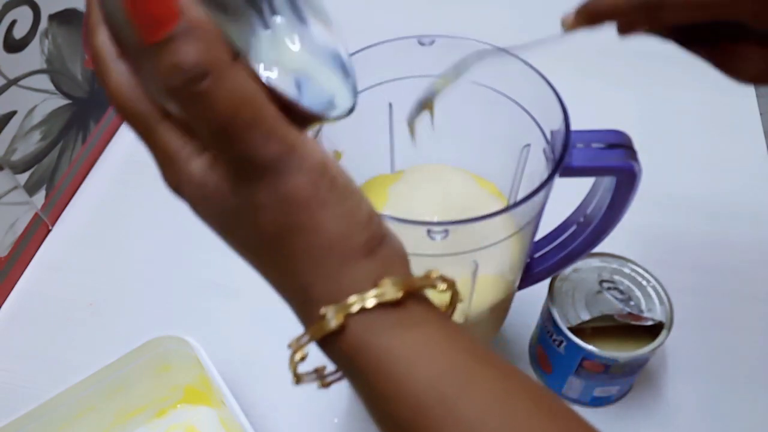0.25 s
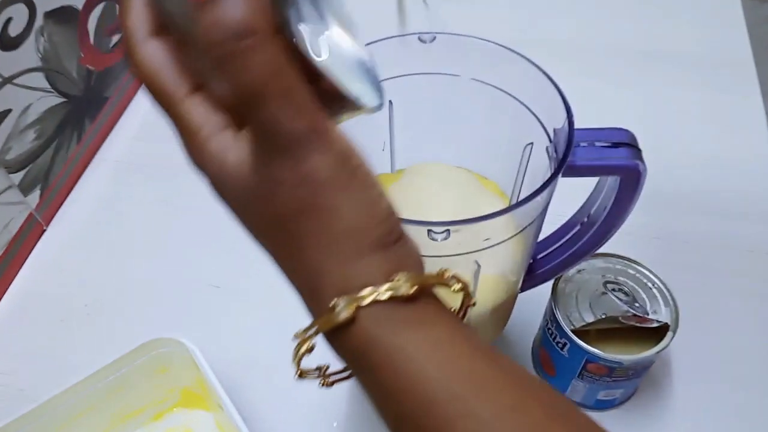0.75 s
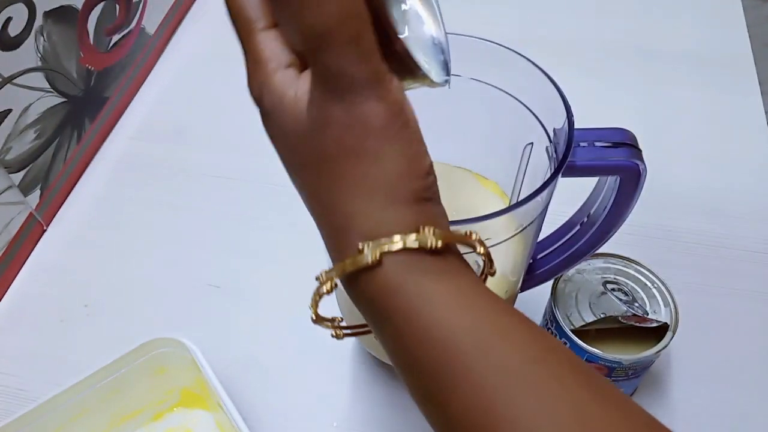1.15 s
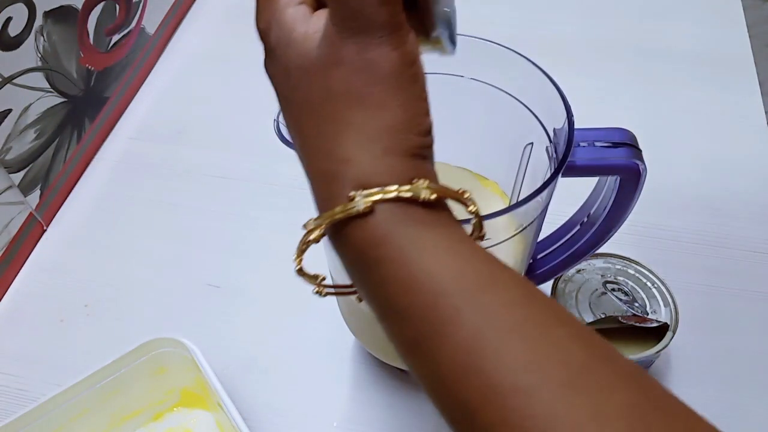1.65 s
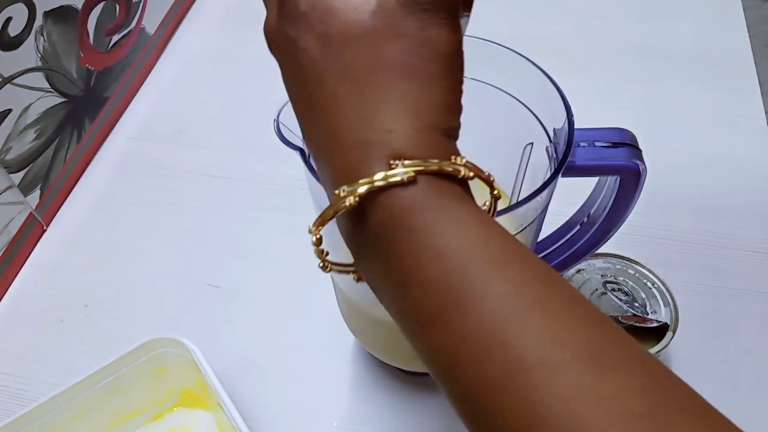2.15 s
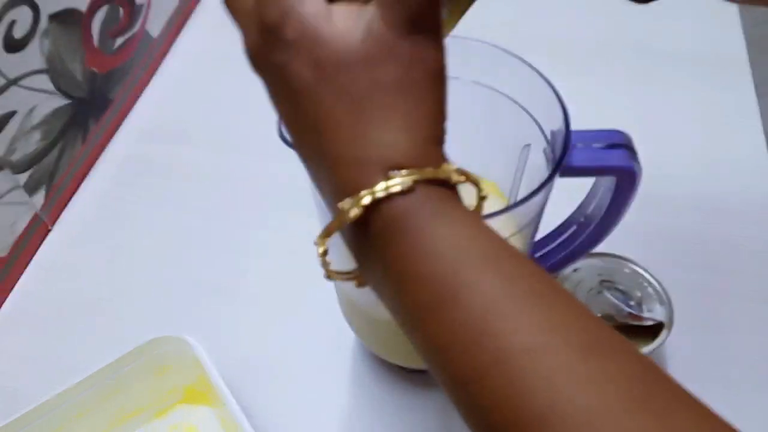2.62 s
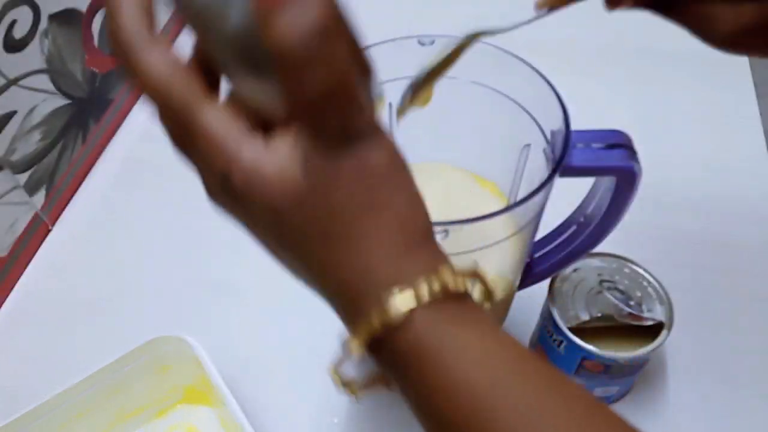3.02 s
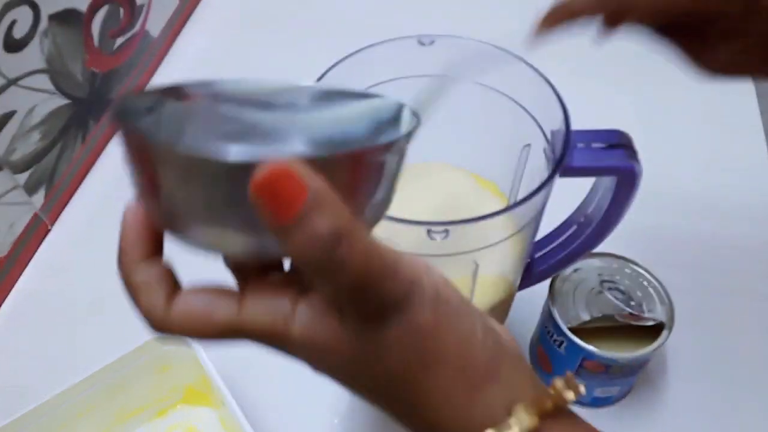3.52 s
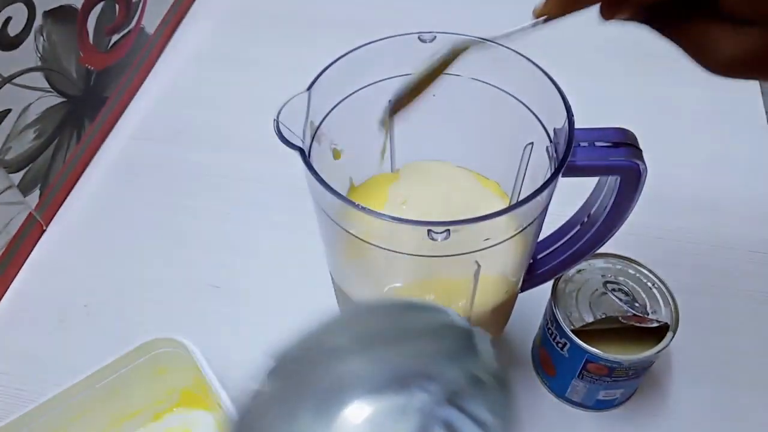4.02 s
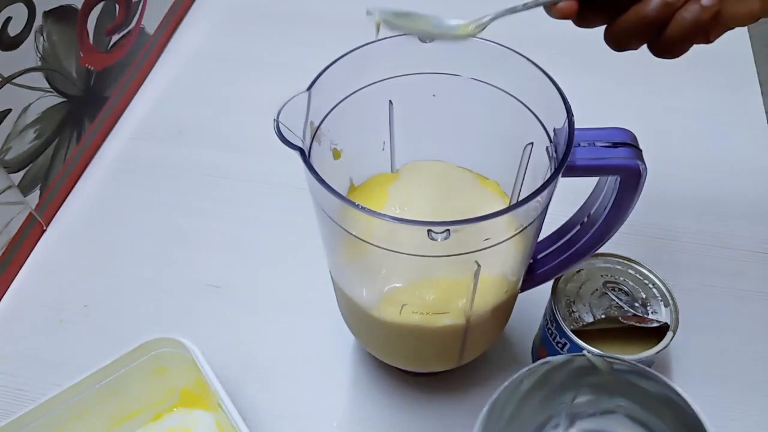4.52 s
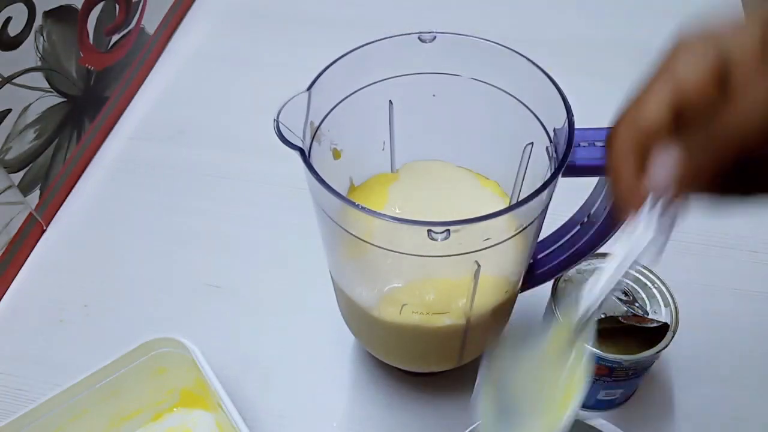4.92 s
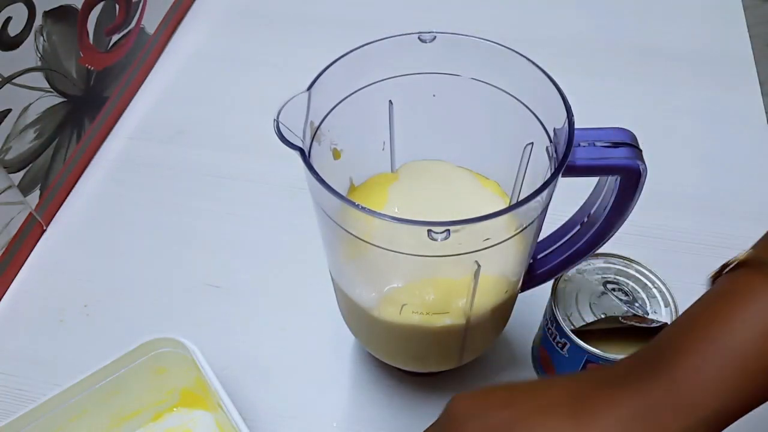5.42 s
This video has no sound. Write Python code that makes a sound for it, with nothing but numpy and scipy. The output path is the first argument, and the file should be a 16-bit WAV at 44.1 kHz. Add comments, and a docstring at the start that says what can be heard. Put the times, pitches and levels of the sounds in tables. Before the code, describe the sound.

Bright metallic scraping and clinking in three strokes, a quiet gap with faint hum and arm rustle, then a final spoon clatter in a bowl.

```python
"""In a small kitchen a steel spoon taps and scrapes the inside of a hand-held steel bowl, and is later
laid into it on the table. Clicks and tiny catches make the metal's modes ring; wall tones sing along.
A motor hums (resonant noise, with a pure tone at the core of its sharpest note), air hisses and moving
arms rustle (coloured noise); the walls add echoes to the metal.
A noise suppressor turns the sound down whenever nothing loud goes on."""
import sys
import numpy as np
from scipy import signal
from scipy.fft import rfft, irfft, next_fast_len
from scipy.io import wavfile
from scipy.ndimage import uniform_filter1d

SR = 44100
rng = np.random.default_rng(int(sys.argv[2]) if len(sys.argv) > 2 else 0)


def bounce(signal):
    """Save signal as a 16-bit WAV file at the path given by the first command-line argument."""
    frames = np.transpose(np.atleast_2d(signal))
    limited = np.clip(frames, -1, 1)
    pcm = np.round(limited * 32767).astype(np.int16)
    wavfile.write(sys.argv[1], SR, pcm)


def gain_from_db(level_db):
    """Turn a decibel level (scalar or array-like) into a linear amplitude factor."""
    decades = np.asarray(level_db, float) / 20
    return 10 ** decades


N = 250047

# The room's noise. Each row: frequency in Hz, relative level in dB per Hz.
AIR_SPECTRUM = [(25, -34), (45, -11.5), (100, 4.5), (170, -2), (240, -0.5), (340, 3), (520, -1),
                (800, -6.5), (1500, -9.5), (3500, -13), (5000, -26), (8050, -23.5), (10500, -32),
                (15500, -34)]
# The motor's notes. Each row: frequency in Hz, width of each resonance in Hz, rms level in dB.
MOTOR_NOTES = [(61.6, 16, -57.5), (133.9, 4.6, -44.5), (154, 40, -55), (204.8, 11, -57.5)]
# A soft rustle as arms move. Each row: time in seconds, relative treble level in dB, middle level in dB.
RUSTLE_LEVELS = [(2.95, -70, -75), (3.3, -65.5, -66), (3.63, -63, -61), (3.86, -57, -87),
                 (3.99, -58.5, -73), (4.07, -52, -56.5), (4.43, -57, -52.5), (4.64, -81, -80),
                 (4.87, -74, -64), (5.1, -63, -53), (5.25, -53, -46.5), (5.44, -55, -49)]
# Colour of its treble. Each row: frequency in Hz, relative level in dB per Hz.
RUSTLE_SPECTRUM = [(4500, -12), (6000, -11), (8050, 3.5), (9500, -6.5), (11600, -11.5), (15500, -11.5)]
# Small ticks as the hand reaches down, the second with a dull and a bright part.
# Each row: start in seconds, level in dB, centre in Hz, width in Hz, length in ms.
TICKS = [(5.093, -47, 8800, 2000, 1.7), (5.266, -38, 1790, 1500, 2.2), (5.266, -47, 9000, 6000, 3.0)]
# Three brief puffs. Each row: start in seconds, level in dB, length in ms.
PUFFS = [(5.296, -50.5, 6.7), (5.338, -53, 10), (5.388, -55.5, 6.8)]
# The bands of a puff. Each row: centre in Hz, width in Hz, level against the puff in dB.
PUFF_BANDS = [(3980, 450, 3), (9100, 860, 1.5), (11800, 3000, -4)]

# Edges between the six families of the metal's modes. Each entry: frequency in Hz.
FAMILY_EDGES_HZ = [950, 1300, 2200, 3500, 6000, 10000, 16000]
# Broad modes of spoon and hand-held bowl in contact.
# Each row: frequency in Hz, width in Hz, relative level in dB, dB gained when the spoon is at the rim.
HELD_MODES = [(1072, 17, -8, -10), (1140, 64, -1.5, 3), (1257, 150, -12, 0.5), (1435, 71, -3.5, -10.5),
              (1548, 25, 7, -1), (1628, 50, -12.5, 23), (1973, 120, -5.5, 5.5), (2730, 20, -2, 2),
              (2827, 47, 8.5, 0), (2937, 50, 4, 11.5), (2960, 15, 5, -7), (3010, 30, -25, -16),
              (3530, 92, -19, -10), (3250, 110, -21, -28), (3824, 120, -12.5, -15.5),
              (4026, 180, -8.5, -10), (4820, 210, -21.5, 22.5), (5340, 59, -9, 18.5), (6670, 130, -14, 2),
              (7470, 410, -16, 4), (7970, 190, -13.5, 12), (9320, 89, -14.5, -6.5), (9200, 53, -48, 18),
              (10890, 30, -14, -1.5), (11540, 400, -30.5, -1), (12520, 310, -39, 7),
              (12800, 140, -28.5, -11), (13100, 140, -24.5, -5), (14100, 100, -34, -1),
              (14600, 220, -20, -3)]
# The same columns for the bowl standing on the table.
RESTING_MODES = [(1210, 1200, -14, 1.5), (1445, 72, 0, 1.5), (1627, 20, -11, -14), (1710, 6.6, -51, 18),
                 (1880, 32, -33, 0), (2770, 21, 2, -6.5), (2890, 36, -4.5, -5.5), (2947, 28, -4, 8.5),
                 (3060, 25, -9, 14), (4440, 50, -24, -6), (5100, 21, -25.5, 2), (6000, 67, -30, 2),
                 (6450, 43, -13, 6), (7270, 8.3, 2, 6.5), (8000, 40, -9, 2), (8200, 120, -14, -4),
                 (8850, 49, -5.5, 6.5), (10140, 220, -19, 6.5), (11100, 90, -23, 0.5), (12000, 65, -21, -4),
                 (13400, 160, -24, 6), (14400, 60, -19, 0), (15100, 41, -10, 5)]
# What the table adds to the rubbing. Each entry: gain of one family in dB.
TABLE_GAIN_DB = [0.5, 3, 2.5, 0, .3, 1.5]
# Where the spoon touches. Each row: time in seconds, place from about -1 deep in the bowl to 1 at the rim.
SPOON_PLACE = [(1.0, -0.92), (1.3, -0.32), (1.6, -0.83), (1.68, 0.91), (1.9, 1), (2.1, -0.088),
               (2.25, -0.71), (2.5, -0.91), (2.7, -0.78), (2.95, -1.12), (5.4, 1), (5.5, 0.56),
               (5.55, -1.34), (5.67, -0.78)]
# Taps. Each row: time in seconds, then relative levels in dB of family one, two, three, four, the top two.
TAPS = [(1.0315, -27, -38, -26, -17.5, -20.5), (1.0367, -45, -48, -24, -29, -28),
        (1.0462, -40, -44, -28, -24.5, -31), (1.074, -20.5, -28, -44, -23, -27.5),
        (1.1867, -48, -47, -42, -30, -38), (1.4026, -12, -53, -22, -23.5, -20),
        (1.425, -25, -28, -47, -44, -42), (1.5371, -26, -24, -33, -34, -40),
        (1.6874, -20, -16.5, -8, -23.5, -18), (1.8344, -32.5, -44, -34, -54, -45),
        (1.9809, -37.5, -49, -27.5, -43, -51), (2.5217, -60, -43, -23.5, -50, -54.5),
        (2.6244, -59, -53, -48, -52, -31.5), (2.71, -55, -37, -39.5, -30.5, -35.5),
        (5.445, -21, -22, -19.5, -24.5, -27), (5.6654, -27.5, -33, -48, -45, -32.5)]
# Which column of a tap drives each family. Each entry: a column number.
TAP_COLUMN = [1, 2, 3, 4, 5, 5]
# Toneless share of the scrape. Each entry: relative level for one family in dB.
RASP_DB = [-33, -27, -18, -31, -8, -5]
# Toneless share of a tap. Each entry: relative level for one family in dB.
CRACK_DB = [4, -14, -26, -11, 7.5, -41]
# Short ring of a tap while the spoon still touches. Each entry: relative level for one family in dB.
PRESSED_DB = [-10, -8.5, -5, -11, -4, -3.5]
# Long ring once the spoon lifts. Each entry: relative level for one family in dB.
FREE_DB = [-2, -11, -17, -11, -11, -25]
# How far the couplings drift as the contact slides. Each entry: spread for one family in dB.
WANDER_DB = [2.8, 3, 2.44, 2.1, 3.9, 3.5]

# Three strokes round the held bowl and a last flick. Each row: time in seconds, treble rasp in dB,
# low tones against it in dB, middle tones against it in dB, how freely the wall sings in dB.
STROKES = [
    [(1.04, -38, 6, 7, 6.5), (1.06, -40.5, -16, 5, -2.5), (1.092, -44.5, -7, 10.5, 5.5),
     (1.13, -48.5, 11, -4, -6.5), (1.16, -44.5, 3.5, 3.5, -3), (1.27, -40, 0.5, 2, -1.5),
     (1.345, -34, -1, 6.5, 3.5), (1.385, -37.5, -4.5, 6, 1.5), (1.412, -39.5, 21.5, 9, 3),
     (1.448, -42, -3, 10.5, 2), (1.476, -33, 8.5, -14, -2), (1.518, -42.5, 4.5, 3, -0.5),
     (1.546, -47.5, 1, 14, 4.5), (1.582, -50.5, 13.5, 2, 2), (1.67, -66, 4, 10, 0.5)],
    [(1.7, -43, -3, 7.5, -3), (1.738, -40.5, 6, 8.5, -1.5), (1.756, -38, -4, 4.5, -2.5),
     (1.83, -46.5, 2.5, 9.5, -2), (1.88, -56, 4, 7.5, -2.5), (1.925, -60, 8, 9, -2.5)],
    [(1.955, -54, -4, 9, 0), (1.984, -46, -1, 10, -0.5), (2.006, -43, -20, -7.5, -1.5),
     (2.03, -41, -13, -1.5, -1), (2.05, -35, -20, 2, 5), (2.095, -36, -2.5, 5, 2), (2.15, -41, -5, 6.5, 2),
     (2.2, -42, -6.5, 3.5, 2.5), (2.276, -45, -9.5, -0.5, 0), (2.31, -46, -9, 6, 9),
     (2.4, -46, 0.5, 4.5, -5), (2.454, -46.5, -2.5, 10.5, 0.5), (2.485, -46, 11, 2.5, -4.5),
     (2.52, -45.5, 8, 7.5, -4.5), (2.57, -47.5, 2.5, 0.5, -5), (2.66, -53, 10, -3.5, -6.5)],
    [(2.69, -46.5, -5, 1.5, -1.5), (2.72, -42, -5, 8.5, -2), (2.738, -52, -4.5, 12, 1.5),
     (2.775, -56, 7, 6.5, -5), (2.91, -73.5, 2, 10.5, -3.5), (2.95, -79, 17, 17, -2)],
]
# The same columns for the spoon sliding into the bowl on the table.
SLIDE = [(5.452, -29, -13, 0, .5), (5.49, -42, 1.5, 6, .5), (5.522, -43.5, 3.5, 2, .5),
         (5.558, -38, 9, -3, 0.17), (5.588, -39, 6, 1, .5), (5.616, -45, 0.5, 3, .5),
         (5.656, -47.5, 9, -0.5, 0.43), (5.67, -52, 8, 9, .5)]
# How each family follows a stroke. Each row: level against the rasp in dB, share of the low tones,
# share of the middle tones, dB gained at the rim, dB lost per dB of free singing.
FOLLOWS = [(-5.5, 0.86, 0.017, 4, -0.7), (1, 0.62, 0.038, 1, -0.14), (1, -0.078, 1.0, -2, 0.86),
           (-8, -0.4, 0.056, -3, 0.05), (-1, 0.12, 0.065, -2.8, 0.14), (-4, -0.18, 0, -0.9, 0.4)]
# The broad rasp near 4 kHz swells and fades on its own while the bowl is held.
# Each row: time in seconds, gain of the fourth family in dB.
FOURTH_FAMILY_SWELL = [(1.04, -2), (1.15, 10.5), (1.28, 2.5), (1.36, -8), (1.6, -10), (1.9, 3), (2.15, 0.5),
                       (2.28, 2.5), (2.45, 0.5), (2.601, -4), (2.71, 4.5), (2.9, 5.5)]
# Third and fourth wall tones. Each row: time in seconds, third against the rasp in dB, fourth in dB.
UPPER_TONES = [(1.04, -14, -24), (1.095, -2, -14), (1.15, -12, -18), (1.25, -14, -14), (1.4, -10.5, -12),
               (1.46, -19, -11), (1.6, -10, -11), (1.75, -15, -28), (1.97, -29, -13), (2.07, -12, -17),
               (2.15, -15, -16), (2.19, -21, 0), (2.33, -18, -13), (2.5, -22, -9.5), (2.73, -15.5, -12)]
# Higher wall tones. Each entry: frequency in Hz.
OVERTONE_HZ = [6650, 7550, 9130, 10350, 12000]
# The same tones. Each row: width in Hz, level against the second tone in dB.
OVERTONES = [(48.6, -15), (43, -15.5), (54, -46), (50, -30), (50, -19)]
# Blows that leave the lowest tone ringing free. Each row: time in seconds, starting level in dB.
FREE_RINGS = [(1.402, -29.5), (1.69, -49), (2.09, -69.5), (2.713, -32.5)]


def rms_one(x):
    """Scales a sound to an rms of 1."""
    return x / np.sqrt(np.mean(x ** 2) + 1e-20)


def in_time(rows):
    """Joins the columns by straight lines, with a level of -120 dB before and after."""
    s, *columns = np.transpose(rows)
    return [np.interp(np.arange(N) / SR, s, column, left=-120, right=-120) for column in columns]


def drift(rate_hz):
    """Slow chance with spread 1: smoothed noise, drawn once per 40 samples."""
    r = np.exp(-80 * np.pi * rate_hz / SR)
    slow = signal.lfilter([1], [1, -2 * r, r * r], rng.standard_normal(N // 40 + 2002))[2000:]
    return np.interp(np.arange(N) / 40, np.arange(len(slow)), rms_one(slow))


def resonate(x, hz, width_hz):
    """Two-pole resonance with gain 1 on top: a narrower one rings longer."""
    r = np.exp(-np.pi * max(width_hz, 1) / SR)
    top = np.array([1, 0, -1]) * (1 - r * r) / 2
    return signal.lfilter(top, [1, -2 * r * np.cos(2 * np.pi * hz / SR), r * r], x + 1e-18)


def band(x, low_hz, high_hz):
    """Keeps what lies between two frequencies."""
    return signal.sosfilt(signal.butter(2, [low_hz, high_hz], "band", fs=SR, output="sos"), x)


def coloured(points):
    """Steady noise with the given spectrum, rms 1."""
    hz, level_db = np.transpose(points)
    size = next_fast_len(N)
    shape = gain_from_db(np.interp(np.log(np.fft.rfftfreq(size, 1 / SR) + 1), np.log(hz), level_db))
    return rms_one(irfft(rfft(rng.standard_normal(size)) * shape, size)[:N])


def room_air():
    """The room's noise: coloured noise whose level drifts a little."""
    return gain_from_db(-46.5 + 0.57 * drift(3.3)) * coloured(AIR_SPECTRUM)


def motor_hum():
    """A motor's notes: resonant noise, with a pure tone at the core of the sharpest note."""
    out = np.zeros(N)
    for hz, width, level_db in MOTOR_NOTES:
        noise = rng.standard_normal(N + SR)
        note = rms_one(resonate(resonate(noise, hz, width), hz, width)[SR:])
        if width < 5:   # only the sharpest note has a pure core
            note = note + 20.0 * np.sqrt(2) * np.sin(2 * np.pi * hz * np.arange(N) / SR)
        out += gain_from_db(level_db) * rms_one(note)
    return out


def kitchen(x):
    """Parallel echoes between the walls, duller on each round."""
    t60_s, wall_cut_hz = 0.25, 3500   # decay by 60 dB before the dulling; treble cut per round
    size = next_fast_len(N + SR)
    w = 2 * np.pi * np.fft.rfftfreq(size, 1 / SR)
    dull = 1 / (1 + 1j * w / (2 * np.pi * wall_cut_hz))
    response = 0
    lags_s = np.geomspace(0.009, 0.037, 10) * rng.uniform(0.95, 1.05, 10)
    for k, lag in enumerate(lags_s):
        loop = gain_from_db(-60 * lag / t60_s) * dull * np.exp(-1j * w * lag)
        response = response + (-1) ** k * loop / (1 - loop)
    return irfft(rfft(x, size) * response, size)[:N]


def arm_rustle():
    """Moving arms: a bright hiss and a duller brushing, both noise with moving levels."""
    treble_db, middle_db = in_time(RUSTLE_LEVELS)
    bright = coloured([(3000, -59)] + RUSTLE_SPECTRUM + [(17000, -58.5)])
    brush = rng.standard_normal(N)
    dull = band(brush, 680, 2200) + 0.94 * resonate(brush, 3600, 230.0) + 1.8 * resonate(brush, 270, 140.0)
    hiss = gain_from_db(treble_db - 2.5 + 0.5 * drift(15.0)) * bright
    return hiss + gain_from_db(middle_db + 1.1 * drift(27.0)) * rms_one(dull)


def ticks_and_puffs():
    """Small ticks and puffs: bands of noise that swell until half their length, then fade."""
    noise, out = rng.standard_normal(N), np.zeros(N)
    puffs = [(s, level_db + band_db, hz, width, ms)
             for s, level_db, ms in PUFFS for hz, width, band_db in PUFF_BANDS]
    for s, level_db, hz, width, ms in TICKS + puffs:
        u = np.maximum(np.arange(N) / SR - s, 0) / (ms / 1000)
        piece = rms_one(band(noise, max(hz - width / 2, 100), min(hz + width / 2, 18000)))
        out += gain_from_db(level_db) * piece * 2 * u * np.exp(1 - 2 * u)
    return out


def free_ring():
    """Height of the lowest tone after each blow: quick swell, steady loss, two close modes beating."""
    attack_s, loss_db_per_s = 0.0023, 88
    beat_hz, beat_depth = 14.8, 0.6   # depth: the weaker mode against the stronger
    out = np.zeros(N)
    for s, level_db in FREE_RINGS:
        t = np.maximum(np.arange(N) / SR - s, 0)
        pair = np.abs(1 + beat_depth * np.exp(2j * np.pi * beat_hz * t)) / (1 + beat_depth)
        out += gain_from_db(level_db - loss_db_per_s * t) * (1 - np.exp(-t / attack_s)) * pair
    return out


def wall_tone(hz, width_hz, rough):
    """A tone on a given pitch; part of it is steady, part is shaken up by noise."""
    r = np.exp(-np.pi * max(width_hz, 1) / SR)
    shaken = signal.lfilter([1], [1, -r], rng.standard_normal(N) + 1j * rng.standard_normal(N))
    shaken = shaken / np.sqrt(np.mean(np.abs(shaken) ** 2))
    turning = np.exp(2j * np.pi * np.cumsum(hz) / SR)
    return np.sqrt(2 / (1 + rough ** 2)) * np.real((1 + rough * shaken) * turning)


def singing(stroke):
    """Four wall tones follow the stroke; higher ones come and go with the second."""
    s, rasp_db, low_db, middle_db, free_db = np.transpose(stroke)
    lowest_db = rasp_db + low_db + 0.26 * free_db - 5
    second_db = rasp_db + middle_db + free_db - 4
    rasp_db, lowest_db, second_db = in_time(np.transpose([s, rasp_db, lowest_db, second_db]))
    tone_s, third_db, fourth_db = np.transpose(UPPER_TONES)
    third_db = np.interp(np.arange(N) / SR, tone_s, third_db)
    fourth_db = np.interp(np.arange(N) / SR, tone_s, fourth_db)
    # the second tone rises by 1.5 Hz per dB as it gets louder
    second_hz = 2877 + 1.5 * (np.clip(second_db, -65, -25) + 38)
    out = (gain_from_db(lowest_db + 1.5 * drift(6.0)) + free_ring()) * wall_tone(np.full(N, 1591), 18.0, rough=0.2)
    out += gain_from_db(second_db) * wall_tone(second_hz, 32.0, rough=0.38)
    out += gain_from_db(rasp_db + third_db) * wall_tone(np.full(N, 4560), 31.0, rough=1.0)
    out += gain_from_db(rasp_db + fourth_db) * wall_tone(np.full(N, 5230), 30.0, rough=1.0)
    for hz, (width, level_db) in zip(OVERTONE_HZ, OVERTONES):
        height = gain_from_db(second_db + level_db + 1.6 * drift(4.3))
        out += height * wall_tone(np.full(N, hz), width, rough=4.6)
    return out


def rubbing(stroke):
    """How hard each family is rubbed through time (dB)."""
    s, rasp_db, low_db, middle_db, free_db = np.transpose(stroke)
    place = np.interp(s, *np.transpose(SPOON_PLACE))
    columns = [s]
    for level_db, low, middle, rim_db, lost in FOLLOWS:
        tones_db = low * low_db + middle * middle_db
        columns.append(rasp_db + level_db + tones_db + rim_db * place - lost * free_db)
    return in_time(np.transpose(columns))


def grit(per_s, spread_db, judder_db):
    """Dense tiny catches of steel on steel, coming in uneven clumps."""
    sizes = gain_from_db(spread_db * np.minimum(rng.exponential(1, N), 4)) * rng.choice([-1, 1], N)
    return rms_one(sizes * (rng.random(N) < per_s / SR) * gain_from_db(judder_db * drift(63.0)))


def steel(modes, rubbed_db, taps):
    """Grit and taps drive the same modes; each mode's coupling wanders as the contact slides."""
    modes, taps, out = np.array(modes), np.array(taps), np.zeros(N)
    catches = grit(6000.0, spread_db=1.5, judder_db=1.5)
    tap_at = np.round(taps[:, 0] * SR).astype(int)
    place = np.interp(np.arange(N) / SR, *np.transpose(SPOON_PLACE))
    t = np.arange(SR // 100) / SR
    crack = rng.standard_normal(len(t)) * np.exp(-t / 0.0004)
    pressed_width_hz = 137   # extra width, so faster decay, while the spoon touches
    for k, level_db in enumerate(rubbed_db):
        low, high = FAMILY_EDGES_HZ[k], FAMILY_EDGES_HZ[k + 1]
        family = modes[(modes[:, 0] >= low) & (modes[:, 0] < high)]
        rub, blows = catches * gain_from_db(level_db), np.zeros(N)
        blows[tap_at] = gain_from_db(taps[:, TAP_COLUMN[k]])
        toneless = rub * gain_from_db(RASP_DB[k]) + signal.fftconvolve(blows, crack)[:N] * gain_from_db(CRACK_DB[k])
        out += band(band(toneless, low, high), low, high) / np.sqrt((high - low) / (SR / 2))
        if k == 0:   # a low thud below the first family
            out += gain_from_db(0.5) * resonate(4.3 * rub + 10.0 * blows, 372, 130)
        heights, widths = gain_from_db(family[:, 2]), family[:, 1]
        steady = np.sqrt(np.sum(heights ** 2 * np.pi * widths / SR))   # rms under white noise
        struck = np.sqrt(np.sum((heights * 2 * np.pi * widths / SR) ** 2))   # height after a unit click
        for hz, width, level, rim_db in family:
            mode_db = level + rim_db * place
            coupling = gain_from_db(mode_db + WANDER_DB[k] * drift(6.3) - 7.5)
            hit = blows * gain_from_db(mode_db + 0.51 * drift(11.0)) / struck
            out += resonate(rub * coupling / steady + hit * gain_from_db(FREE_DB[k]), hz, width)
            # pressed: energy passes from spoon to bowl, so the ring swells for a moment, then dies fast
            wide = width + pressed_width_hz
            push = hit * gain_from_db(PRESSED_DB[k]) * np.e * width / wide
            out += resonate(resonate(push, hz, wide), hz, wide)
    return out


def scene():
    """Adds the room's sounds, the held bowl, the bowl on the table and the metal's echoes."""
    room = room_air() + motor_hum() + arm_rustle() + ticks_and_puffs()
    taps_in_hand = [row for row in TAPS if row[0] < 4]
    taps_on_table = TAPS[len(taps_in_hand):]
    strokes = np.concatenate(STROKES)
    held_db = np.array(rubbing(strokes))
    held_db[3] += np.interp(np.arange(N) / SR, *np.transpose(FOURTH_FAMILY_SWELL))
    table_db = np.array(rubbing(SLIDE)) + np.c_[TABLE_GAIN_DB]
    metal = steel(HELD_MODES, held_db, taps_in_hand) + singing(strokes)
    metal += steel(RESTING_MODES, table_db, taps_on_table)
    return (metal + gain_from_db(-25) * kitchen(metal) + room)[None]


def top_cut(x):
    """Nothing passes above the cut-off."""
    return signal.sosfilt(signal.butter(12, 16730, fs=SR, output="sos"), x)


def record(dry):
    """The suppressor opens fast when the upper band gets loud and closes after it; peaks are rounded."""
    duck_db, open_from_db, open_span_db = 5, -57.5, 22.5
    power = uniform_filter1d(band(dry[0], 1900, 8500) ** 2, size=900)
    opened = np.clip((10 * np.log10(power + 1e-12) - open_from_db) / open_span_db, 0, 1)
    fall = 19.0 * np.arange(N) / SR   # closing speed: 19 full spans per second
    opened = np.maximum.accumulate(opened + fall) - fall
    ducked = dry * gain_from_db(-duck_db * (1 - uniform_filter1d(opened, size=600)))
    rounded = 1.1 * np.tanh(ducked / 1.1)
    return top_cut(rounded)


dry = scene()
out = record(dry)
bounce(out)
```